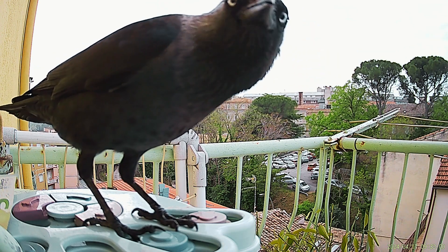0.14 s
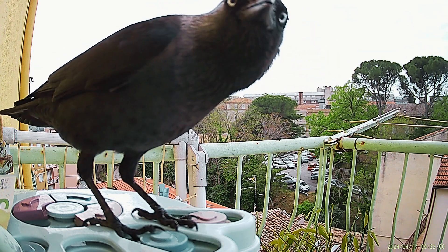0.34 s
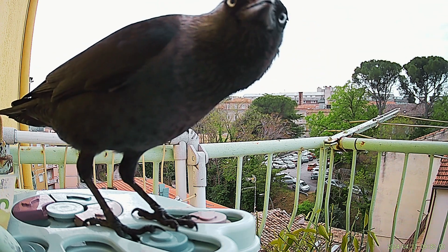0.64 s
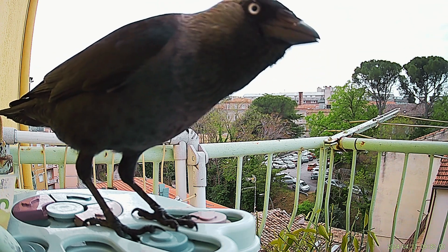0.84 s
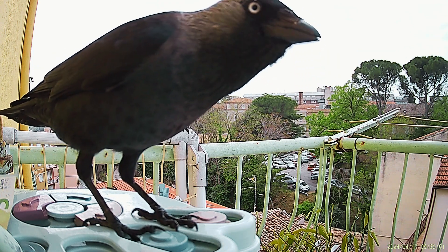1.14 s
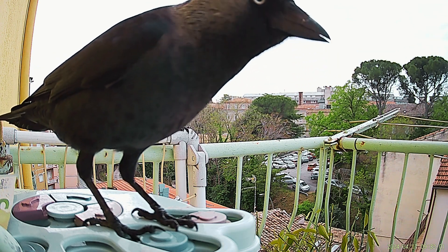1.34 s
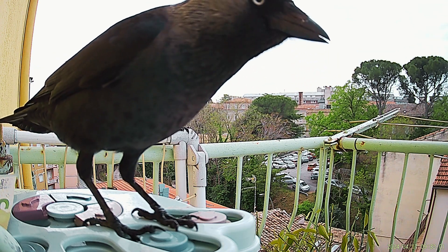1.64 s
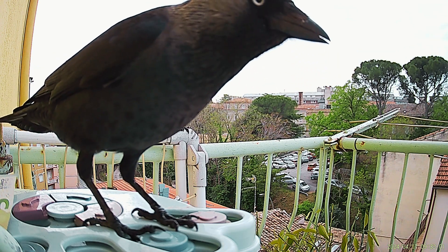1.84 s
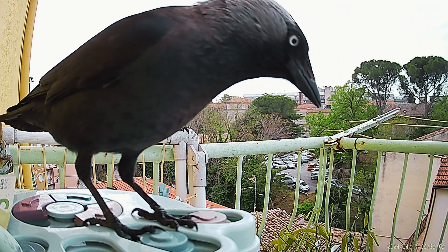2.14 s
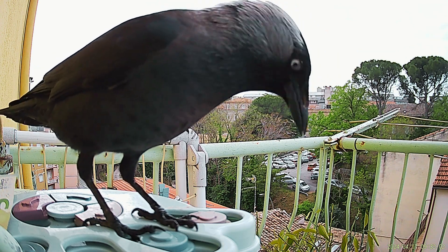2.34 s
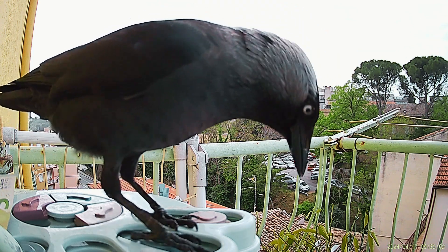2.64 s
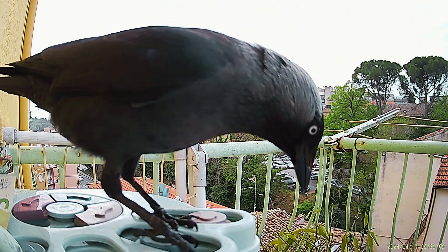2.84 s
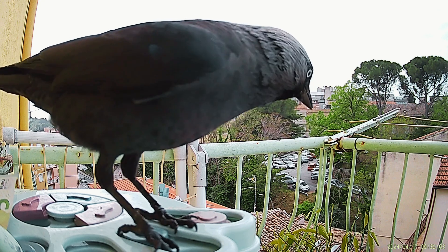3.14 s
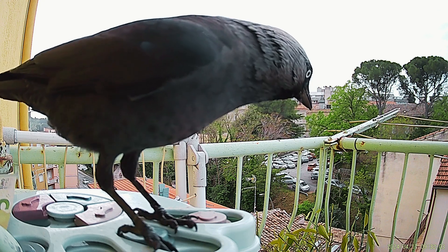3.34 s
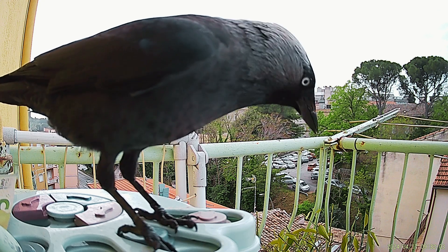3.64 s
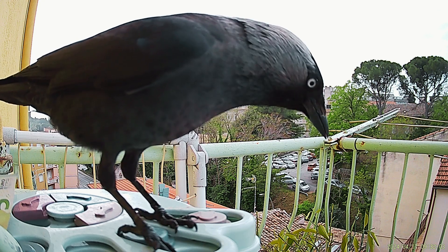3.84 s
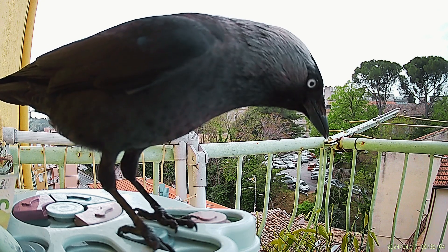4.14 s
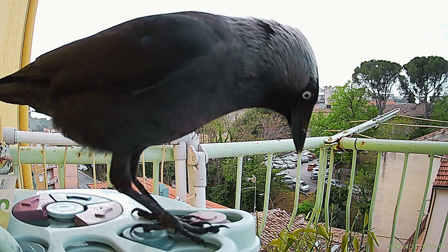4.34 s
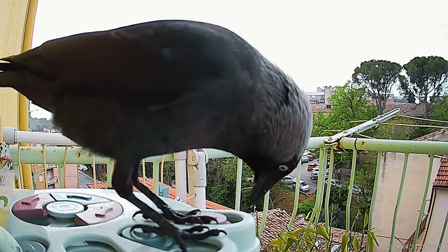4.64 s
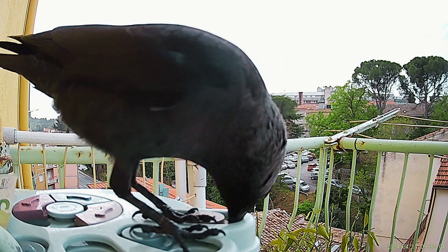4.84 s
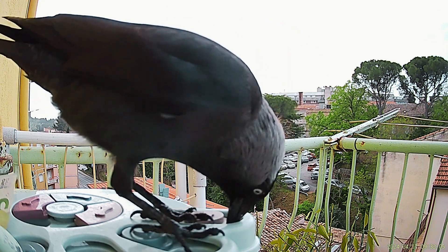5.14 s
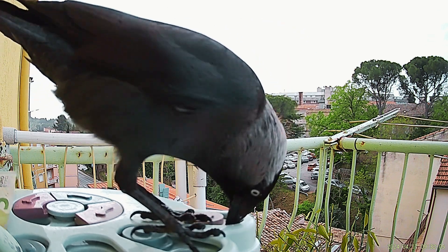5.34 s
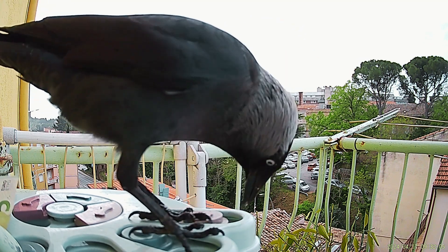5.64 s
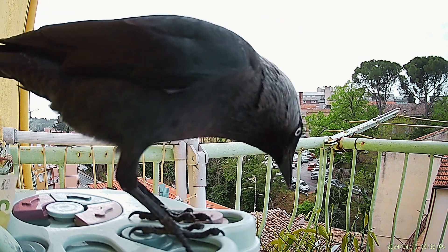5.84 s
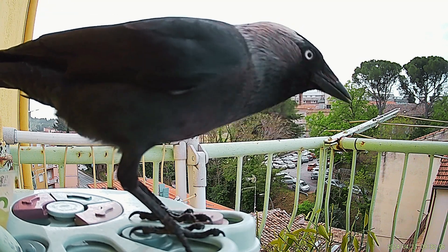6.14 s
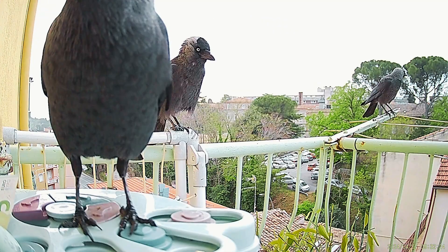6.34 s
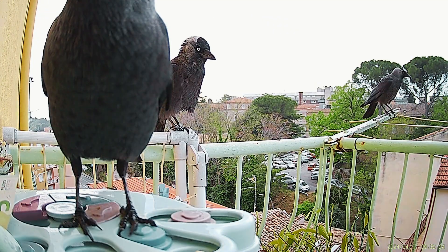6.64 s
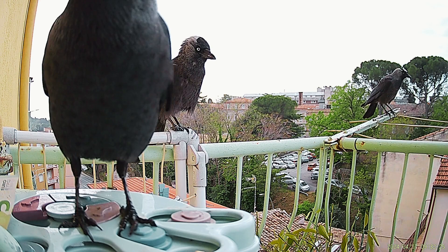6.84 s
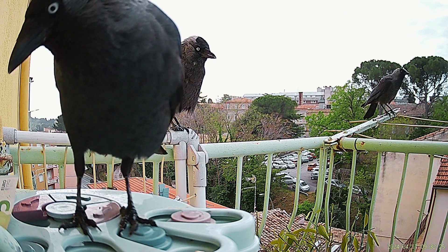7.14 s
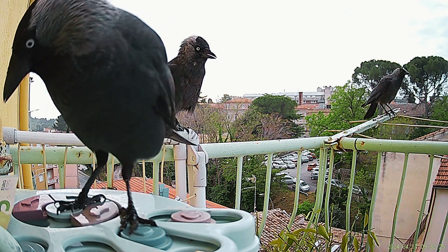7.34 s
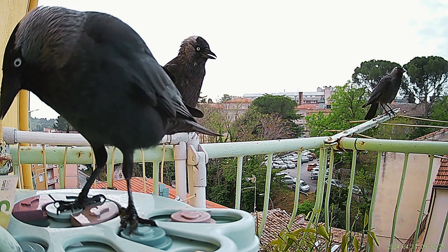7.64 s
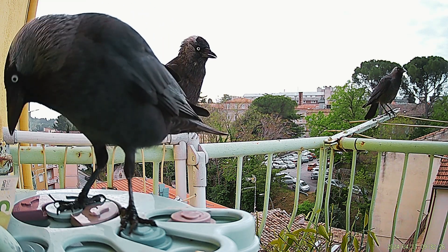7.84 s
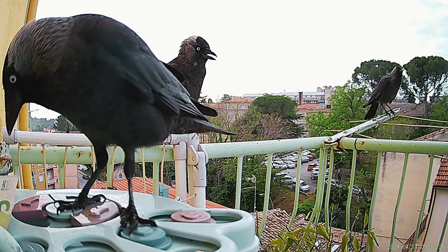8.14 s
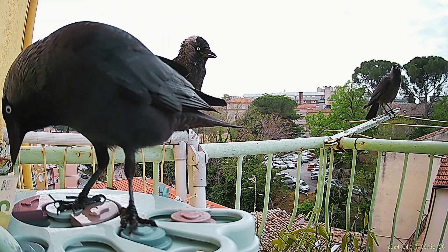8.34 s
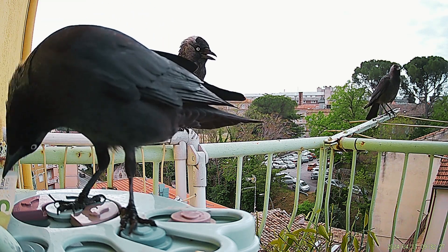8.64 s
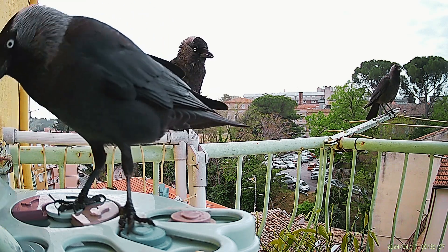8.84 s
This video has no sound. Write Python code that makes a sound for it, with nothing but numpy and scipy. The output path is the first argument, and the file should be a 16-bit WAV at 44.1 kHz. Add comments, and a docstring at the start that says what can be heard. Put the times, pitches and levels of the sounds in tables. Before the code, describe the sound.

On an open balcony, brief hoarse jackdaw calls mix with clattering plastic taps, wing flutters and one heavy thump, above quiet distant traffic.

```python
"""Far whistles and a trilling songbird open over town hum, road wash and a little wind; taps on plastic follow.
Then jackdaws give close, falling 'tchak' calls: sliding harmonics and breath shaped by a throat resonance.
Wings flutter as filtered noise; beaks and claws rap a ringing plastic toy, with one heavy low thump. The sound
drops out for an instant, then calls resume, one cut short abruptly, and taps and gusts close. Walls and roofs
answer the near sounds and the songbirds with short echoes and scatter."""
import sys
import numpy as np
from scipy import signal
from scipy.fft import rfft, irfft
from scipy.io import wavfile

SR = 44100
rng = np.random.default_rng(int(sys.argv[2]) if len(sys.argv) > 2 else 0)


def output_pcm(signal):
    """Save a mono or channel-first signal as 16-bit PCM at the path in sys.argv[1].

    Samples are clipped to [-1, 1] before scaling.
    """
    pcm = np.clip(np.atleast_2d(signal).T, -1, 1) * 32767
    wavfile.write(sys.argv[1], SR, np.round(pcm).astype(np.int16))


N = 396018

# jackdaw calls: start_s, length_s, level_db (before the contours), start_pitch_hz,
# bend (1 = straight fall, more = held first), rasp (0-1), chest_db (on the fundamental),
# swell_db (onset to middle), treble_db (boost or cut above about 5 kHz)
CALLS = [ (2.818, 0.071, -26.5, 1384, 1.13, 0.11, 2.5, 4.5, 8),
         (4.721, 0.064, -26.5, 1348, 1.3, 0.11, 4, 6.5, 4.5),
         (5.036, 0.061, -25, 1273, 1.2, 0.17, 3, 7.5, -17),
         (5.27, 0.063, -23, 1280, 1.22, 0.06, 2.5, 5, 14.5),
         (5.784, 0.061, -24.5, 1305, 1.22, .12, 2.5, 2, 14.5),
         (5.951, .043, -28, 1162, 4.4, 0.41, 18.5, -2.5, -37),
         (6.107, 0.055, -21.5, 1272, 1.27, 0.09, 2, 1, -36),
         (7.269, 0.054, -30, 1145, 1.25, 0.13, 1, 9.5, 5), (7.534, 0.064, -27, 1185, 1.1, 0.16, 1, 7, 9),
         (7.719, 0.06, -26, 1199, 1.29, .15, 1.5, 8, 8),
         (8.183, 0.065, -26.5, 1233, 1.22, 0.13, 1.5, 7.5, -26),
         (8.654, 0.067, -22.5, 1261, 1.09, .12, 2.5, 7, 8.5),
         (8.971, 0.079, -23.5, 1224, 3.1, 0.26, -16, 2, -19)]
# resonance of throat and open beak: frequency_hz, gain_db
THROAT = [(500, -16.5), (850, -17), (1200, -24.5), (1450, -11.5), (1750, -4), (2250, 1.5), (2480, -4),
          (2780, 1.5), (3050, -10), (3350, -13), (3700, -9), (4450, -2), (4950, -18), (6000, -15.5),
          (8500, -36.5)]
# syrinx harmonics from the first up, ahead of the throat: level_db
HARMONICS = [0, 0, -8, -18.5, -30, -20, -16.5, -21.5, -14, -16.5]
# colour of the air rushing through the syrinx: frequency_hz, gain_db
BREATH = [(2500, 12.5), (4500, -10), (8000, -4)]
# each call's treble gain, a boost or a cut, fades in between these: frequency_hz
TREBLE_HZ = [4600, 5100]
# beak and claw taps: start_s, level_db (before the burst and ring gains), burst_centre_hz,
# burst_t60_s, ring_db (of the plastic, relative)
TAPS = [ (2.488, -66.5, 5460, 0.016, -11), (2.597, -61, 5000, 0.016, -6), (2.609, -67.5, 5560, 0.02, -12),
        (3.039, -45, 1360, 0.042, -14), (4.413, -67, 4970, 0.0089, -5), (4.602, -56.5, 2500, 0.012, -6),
        (4.612, -51, 4370, 0.012, -8.5), (4.901, -50, 1980, 0.03, -17), (4.907, -57.5, 2470, 0.075, 0),
        (4.941, -65, 3000, 0.022, -2), (5.03, -62, 1990, 0.0088, 5), (5.171, -42, 1930, 0.011, -6),
        (5.335, -33.5, 2180, 0.021, -2), (5.343, -37.5, 2126, 0.035, -1.5), (5.354, -38, 3190, 0.028, -3),
        (5.381, -43, 3030, 0.014, 1), (5.448, -50, 2500, 0.019, -3.5), (7.236, -71, 2990, 0.037, -10),
        (7.338, -52, 3030, 0.017, -8), (7.3453, -45.5, 2150, 0.016, -9.5), (8.714, -46, 1230, 0.031, 0.5),
        (8.724, -48, 1220, 0.12, 5), (8.782, -27.5, 1820, 0.011, -11.5), (8.792, -57, 1810, 0.17, 15.5),
        (8.878, -57, 2500, 0.017, -12), (8.920, -40, 1427, 0.029, 5.5), (8.947, -52.5, 1500, 0.038, 11)]
# modes of the plastic toy, detuned afresh at each tap: frequency_hz, level_db, t60_s
PLASTIC_MODES = [(192.7, -7, 0.24), (410, -13.5, 0.36), (597.5, -1, 0.052), (846, 5, .04),
                 (1280, -1, 0.027), (1840, 3.5, 0.018), (2438, -11, 0.016)]
# wing strokes and shuffles: start_s, length_s, pushed_air_db, feather_rustle_db (before its crackle)
FLUTTERS = [(2.971, 0.057, -71, -64), (3.05, 0.16, -61.5, -74), (4.527, 0.06, -63.5, -74),
            (4.903, 0.072, -55, -67), (4.993, .095, -46.5, -66), (5.18, .065, -43, -59),
            (5.325, .10, -40, -47.5), (5.463, 0.08, -51, -65.5), (5.95, .25, -60.5, -71),
            (8.87, 0.13, -55, -65)]
# songbird trills: start_s, end_s, level_db (before chance)
TRILLS = [(1.406, 2.35, -86.5), (2.516, 2.7, -84.5), (3.107, 3.45, -85.5), (3.998, 4.7, -84),
          (5.528, 5.76, -79)]
# distant whistles: start_s, length_s, start_pitch_hz, end_pitch_hz, level_db (before flutter)
WHISTLES = [(0.103, 0.57, 5580, 5750, -89), (.398, .11, 5830, 5880, -84), (.973, 0.11, 5250, 5740, -90),
            (1.238, 0.092, 4570, 3500, -84), (1.345, .03, 3400, 4420, -83), (1.48, .33, 2750, 3100, -92),
            (7.787, .14, 3400, 3710, -78)]
# single echoes from the balcony walls: delay_s, level_db
WALL_ECHOES = [(.0046, -17), (0.0158, -20.5), (.0185, -31.5), (.026, -29.5), (0.035, -31.5)]
# wind gusts: peak_s, half_width_s, level_db
GUSTS = [(0.03, 0.078, -65), (6.35, .2, -60.5), (7.45, 0.23, -62.5), (8.58, 0.29, -52.5)]
# level of the town's low hum, before its gain and drift: time_s, level_db
HUM_LEVEL = [(0.0, -70), (2.68, -70.5), (2.99, -67.5), (4.5, -68), (5.7, -62), (6.46, -69), (6.9, -70.5),
             (7.75, -66.5), (8.07, -68), (8.98, -57)]
# level of the midrange wash, mostly tyres on a far road, before its gain and drift: time_s, level_db
ROAD_LEVEL = [(0.0, -66.5), (1.33, -69.5), (2.02, -76.5), (2.84, -74.5), (2.95, -69.5), (4.65, -74.5),
              (5.6, -68.5), (6.06, -69.5), (6.17, -77), (6.31, -79.5), (7.13, -79.5), (7.67, -71),
              (8.18, -74.5), (8.98, -63)]
# spectrum of the wind rumble: frequency_hz, gain_db
WIND_COLOUR = [(15, -18), (28, -9), (36, -2.5), (41, 4), (47, -4), (75, -16), (130, -26), (300, -56.5)]
# spectrum of the town hum: frequency_hz, gain_db
HUM_COLOUR = [(30, -9.5), (70, 4), (120, -2.5), (200, -2.5), (270, -5.5), (291, 4.5), (315, -5.5),
              (420, -8.5), (700, -13.5), (2000, -46)]
# spectrum of the road wash: frequency_hz, gain_db
ROAD_COLOUR = [(200, -10), (500, -7.5), (700, -2), (900, 2.5), (1150, 1), (1400, 0.5), (1850, -3),
               (2300, -19.5), (3500, -26.5), (8000, -38)]
# spectrum of the steady hiss: frequency_hz, gain_db
HISS_COLOUR = [(500, -4), (2500, 4.5), (4000, -0.5), (5500, -3.5), (7300, -2.5), (8500, -27)]

FALL = 0.48  # share of its pitch that a call loses over its length
OVERTONE_DB = 3.5  # growth of harmonics three and four as the beak opens
SMEAR = 0.3  # radians of phase flutter for each harmonic above the second, once the note is hoarse
# air pressure starts high, sags evenly, then collapses at the end of a call
PUSH_DB, SAG_DB, COLLAPSE_DB, COLLAPSE_POWER = 1.5, 7, 15.5, 4.8
ATTACK_S, OPEN_SHARE = 0.0025, 0.51  # onset; share of the call that the beak takes to open
BREAK_S = 8.2205  # one call is cut short abruptly here
THUMP_S, THUMP_DB, THUMP_HZ, THUMP_RISE_S = 5.3328, -25, 238, 0.0013
FLUTTER_ATTACK_S, FLUTTER_T60_S = 0.015, 0.2
# each songbird note flicks up, turns at this share of its length, and falls
NOTE_GAP_S, NOTE_S, NOTE_TURN, NOTE_HZ = 0.0597, 0.043, 0.22, [3783, 4250, 3100]
# light air between the gusts; gains of the two level curves; steady hiss
WIND_DB, HUM_GAIN_DB, ROAD_GAIN_DB, HISS_DB = -71.5, 1.5, 1, -82
NEAR_DB, NEAR_T60_S = -21, 0.14  # scatter in the balcony
FAR_DB, FAR_T60_S, FAR_HZ = -36.5, 0.55, 3400  # return from the roofs
SILENCE_S, RETURN_S, FADE_IN_S = 6.216, 6.236, 0.025  # the brief dropout and its return
EDGE_HZ = 8600  # upper band limit


def amp(db):
    """Decibels to linear gain."""
    return 10 ** (np.asarray(db) / 20)


def evened(x):
    """Scales to rms 1."""
    return x / np.sqrt(np.mean(x ** 2) + 1e-20)


def read(points, hz):
    """Reads a spectrum in dB on a log-frequency axis."""
    f, db = np.transpose(points)
    return np.interp(np.log(hz + 1), np.log(f), db)


def curve(rows):
    """Reads a table of times and values at every sample."""
    return np.interp(np.arange(N) / SR, *np.transpose(rows))


def add(mix, s, sound):
    """Lays a sound into the mix at s seconds, cut at the end of the mix."""
    part = mix[round(s * SR):][:len(sound)]
    part += sound[:len(part)]


def coloured(points, size):
    """Noise of rms 1 with the given spectrum."""
    gain = amp(read(points, np.fft.rfftfreq(size, 1 / SR)))
    return evened(irfft(rfft(rng.standard_normal(size)) * gain, size))


def drift(rate, size):
    """Straight lines between random values of unit spread, drawn rate times a second."""
    knots = rng.standard_normal(size + 2)
    return np.interp(np.arange(size) * min(rate / SR, 1), np.arange(size + 2), knots)


def band(x, hz, q):
    """One broad resonance."""
    return signal.lfilter(*signal.iirpeak(min(hz, SR / 4), q, fs=SR), x)


def caw(length, level_db, start_hz, bend, rasp, chest_db, swell_db, treble_db, size=4400):
    """Harmonics slide down through the throat resonance; the note starts pure and turns hoarse as it sags."""
    t, hz = np.arange(size) / SR, np.fft.rfftfreq(size, 1 / SR)
    u = t / length
    pitch = np.maximum(start_hz * (1 - FALL * u ** bend), 400)
    hoarse = np.clip(u, 0, 1) ** 2
    jitter = (0.004 + 0.028 * hoarse) * drift(1100, size)
    turns = np.cumsum(pitch * (1 + jitter)) / SR
    closed = np.clip(1 - u / OPEN_SHARE, 0, 1)  # 1 at the onset, 0 once the beak is wide open
    voice = np.zeros(size)

    def tone_gain(f):
        """Gain of the throat resonance, plus each call's set level above about 5 kHz."""
        return amp(read(THROAT, f) + treble_db * np.interp(f, TREBLE_HZ, [0, 1]))

    for k, db in enumerate(HARMONICS, 1):
        colour_db = chest_db * (k == 1) - 16 * closed * (k > 3)
        colour_db = colour_db + OVERTONE_DB * (1 - closed) * (k in (3, 4))
        # the throat delays each harmonic differently, which smears the pulse
        flutter = SMEAR * max(k - 2, 0) * np.sqrt(hoarse) * drift(900, size)
        phase = 2 * np.pi * k * turns + np.pi * k ** 2 / 4 + flutter
        voice += amp(db + colour_db) * tone_gain(k * pitch) * np.cos(phase)
        # alternate strong and weak cycles put faint lines between the harmonics
        half = k + 0.5
        uneven = 2 * rasp ** 2 * (1 + 0.99 * hoarse) * (1 + 0.4 * drift(400, size))
        voice += uneven * amp(db) * tone_gain(half * pitch) * np.cos(2 * np.pi * half * turns)

    # air rushes through the syrinx in one puff a cycle
    air_spectrum = rfft(rng.standard_normal(size)) * tone_gain(hz) * amp(read(BREATH, hz))
    puffs = 1 + 0.56 * np.cos(2 * np.pi * turns)
    air_gain = 1.94 * rasp * (hoarse + 0.011 * (1 - closed))
    voice += air_gain * evened(irfft(air_spectrum, size)) * puffs

    pressure_db = PUSH_DB - SAG_DB * u - COLLAPSE_DB * u ** COLLAPSE_POWER - swell_db * closed
    onset = 1 - np.exp(-(t / ATTACK_S) ** 2)
    return np.sqrt(2) * amp(level_db + pressure_db) * voice * onset


def jackdaws():
    """Every call in turn; one is cut short in mid-note."""
    out = np.zeros(N)
    for s, *call in CALLS:
        sound = caw(*call)
        if s < BREAK_S:
            sound = sound[:round((BREAK_S - s) * SR)]
        add(out, s, sound)
    return out


def taps(size=6000):
    """A hard tip scuffs the toy: a short burst of noise, and the plastic rings."""
    out, t = np.zeros(N), np.arange(size) / SR
    for s, level_db, hz, t60, ring_db in TAPS:
        burst = evened(band(band(rng.standard_normal(size), hz, 1.0), hz, 0.79))
        burst = burst * amp(-60 * t / t60) * (1 - np.exp(-t / 0.0003))
        ring = np.zeros(size)
        for f, db, decay in PLASTIC_MODES:
            tone = np.sin(2 * np.pi * f * rng.uniform(0.85, 1.04) * t)
            ring += amp(db - 60 * t / decay) * tone * rng.choice([-1, 1])
        add(out, s, amp(level_db) * (2 * burst + 0.66 * amp(ring_db) * ring))
    return out


def thump(size=6000):
    """A heavy blow shoves the whole toy: a low push that dies within two cycles."""
    out, t = np.zeros(N), np.arange(size) / SR
    turn = 2 * np.pi * THUMP_HZ * t
    push = t / THUMP_RISE_S * np.exp(1 - t / THUMP_RISE_S)
    add(out, THUMP_S, -amp(THUMP_DB) * push * (np.sin(turn) + 0.4 * np.sin(1.5 * turn)))
    return out


def wings():
    """Each stroke pushes a low puff of air while the feathers crackle: quick rise, hold, release."""
    puffs = coloured([(30, -32.0), (70, -15.5), (108, 4.0), (150, -10.5), (195, -9.5), (260, -22.5),
                      (500, -22.0), (1200, -70)], N)
    feathers = coloured([(150, -4), (400, 6.5), (1000, 4), (2200, -3), (4000, -8), (8000, -27.5)], N)
    feathers = feathers * amp(2.5 * drift(350, N))  # crackle
    out = np.zeros(N)
    for s, length, air_db, feather_db in FLUTTERS:
        t = np.arange(N) / SR - s
        rise = np.clip(t / FLUTTER_ATTACK_S, 0, 1)
        release = amp(-60 * np.clip((t - length) / FLUTTER_T60_S, 0, 2))
        out += rise * release * (amp(air_db) * puffs + amp(feather_db) * feathers)
    return out


def whistle(pitch, level_db):
    """A thin tone on a pitch curve; it flutters on its way through the air."""
    size = len(pitch)
    wavering = pitch * (1 + 0.01 * drift(300, size))
    loudness = amp(level_db + 2 * drift(80, size)) * signal.windows.tukey(size, 0.5)
    return loudness * np.sqrt(2) * np.sin(2 * np.pi * np.cumsum(wavering) / SR)


def songbirds():
    """Far trills of quick hooked notes, and a few gliding whistles."""
    out = np.zeros(N)
    hook = np.interp(np.linspace(0, 1, int(NOTE_S * SR)), [0, NOTE_TURN, 1], NOTE_HZ)
    for start, end, db in TRILLS:
        for s in np.arange(start, end, NOTE_GAP_S):
            add(out, s, whistle(hook, db + rng.normal(0, 1)))
    for s, length, start_hz, end_hz, db in WHISTLES:
        glide = np.geomspace(start_hz, end_hz, int(length * SR))
        add(out, s, whistle(glide, db))
    return out


def town():
    """Wind rumble that swells in gusts, the hum of the town, tyres on a far road and a thin steady hiss."""
    now = np.arange(N) / SR
    gust_power = sum(amp(db) ** 2 * np.exp(-((now - s) / width) ** 2) for s, width, db in GUSTS)
    wind = np.sqrt(amp(WIND_DB) ** 2 + gust_power) * coloured(WIND_COLOUR, N)
    hum = amp(curve(HUM_LEVEL) + HUM_GAIN_DB + 1.22 * drift(8.4, N)) * coloured(HUM_COLOUR, N)
    road = amp(curve(ROAD_LEVEL) + ROAD_GAIN_DB + 1.2 * drift(13, N)) * coloured(ROAD_COLOUR, N)
    hiss = amp(HISS_DB) * coloured(HISS_COLOUR, N)
    return wind + hum + road + hiss


def outdoors(x, size=30000):
    """Single echoes off the near walls, a short scatter in the balcony and a faint return from the roofs."""
    t = np.arange(size) / SR
    near, far = rng.standard_normal((2, size))
    near = near * amp(-60 * t / NEAR_T60_S) * (t > 0.013)
    far = band(far, FAR_HZ, 0.87) * amp(-60 * t / FAR_T60_S) * np.clip(t / 0.15, 0, 1) ** 2
    response = amp(NEAR_DB) * near / np.linalg.norm(near) + amp(FAR_DB) * far / np.linalg.norm(far)
    for delay, db in WALL_ECHOES:
        add(response, delay, amp([db]))
    return x + signal.fftconvolve(x, response)[:N]


def scene():
    """Birds and toy with their echoes, over the town."""
    direct = jackdaws() + taps() + thump() + wings() + songbirds()
    before = np.arange(N) / SR < SILENCE_S
    # no echo carries across the dropout
    first = outdoors(direct * before) * before
    second = outdoors(direct * ~before)
    return (first + second + town())[None]


def record(dry):
    """The sound drops almost to nothing for an instant and fades back in; then the treble is band-limited."""
    now = np.arange(N) / SR
    fade = np.clip((now - RETURN_S) / FADE_IN_S, 0.015, 1)
    out = dry * np.where(now < SILENCE_S, 1, fade)
    lowpass = signal.firwin(301, EDGE_HZ, window=("kaiser", 8), fs=SR)
    return signal.oaconvolve(out, lowpass[None], "same")


dry = scene()
out = record(dry)
output_pcm(out)
```